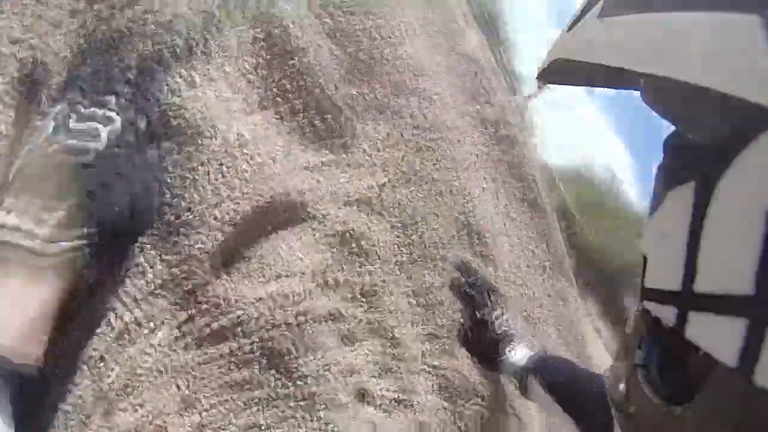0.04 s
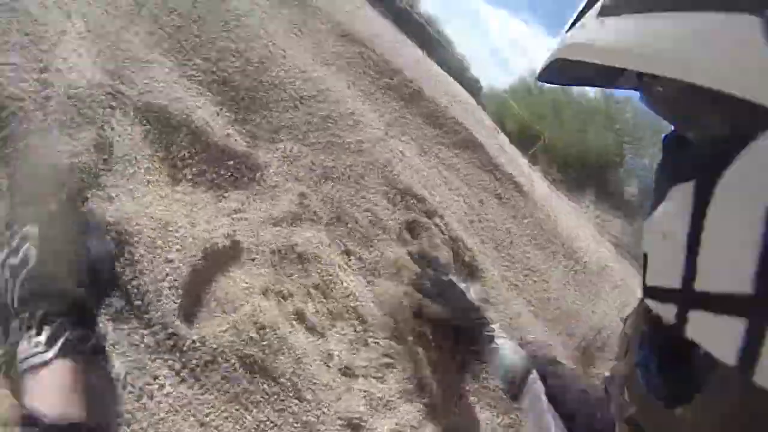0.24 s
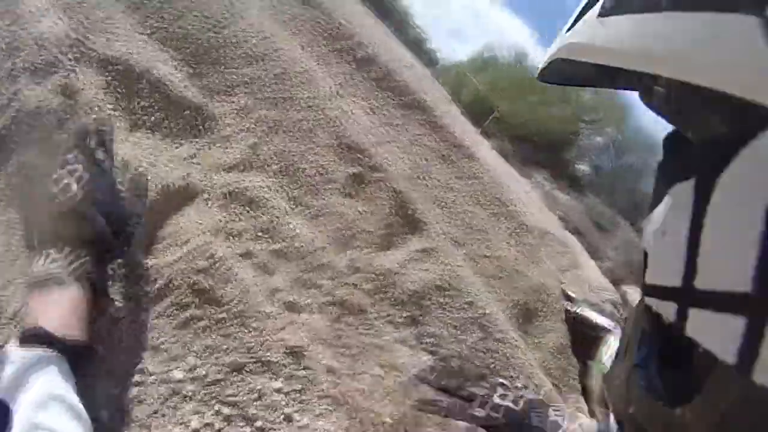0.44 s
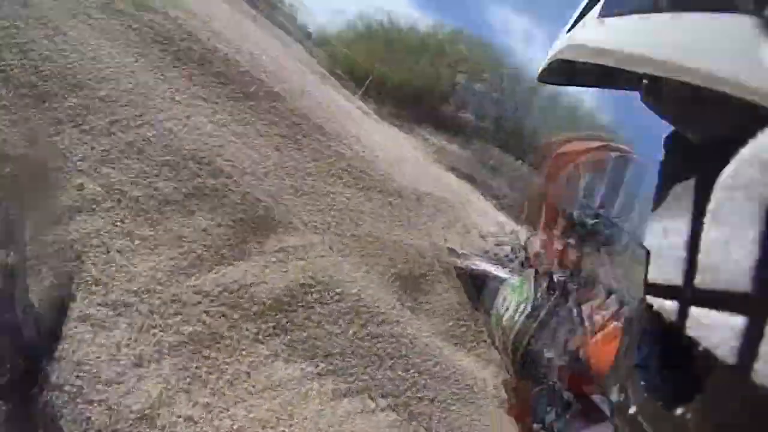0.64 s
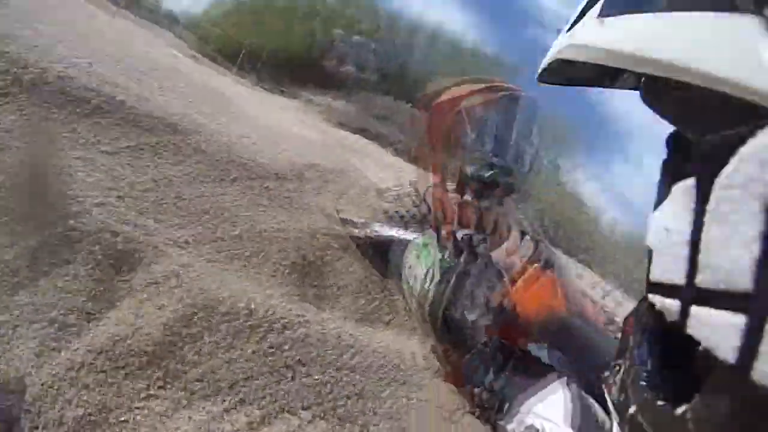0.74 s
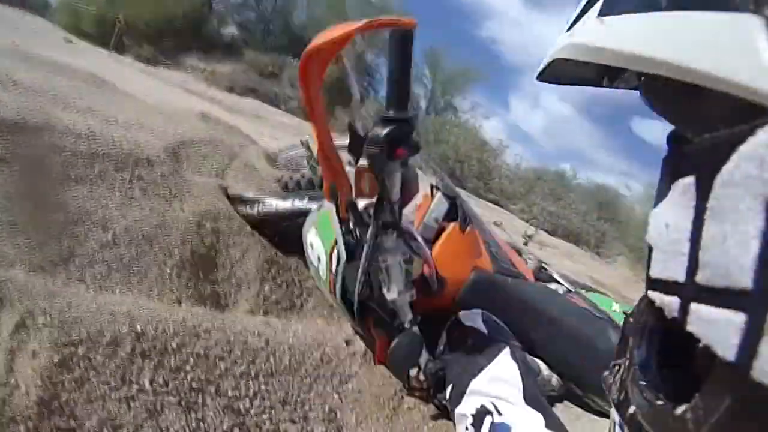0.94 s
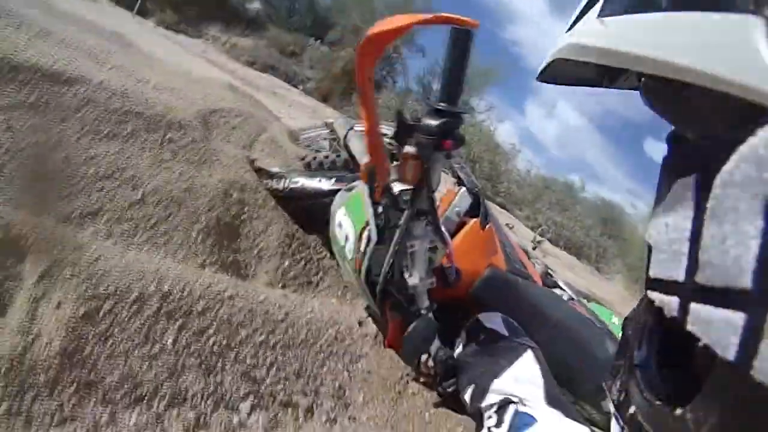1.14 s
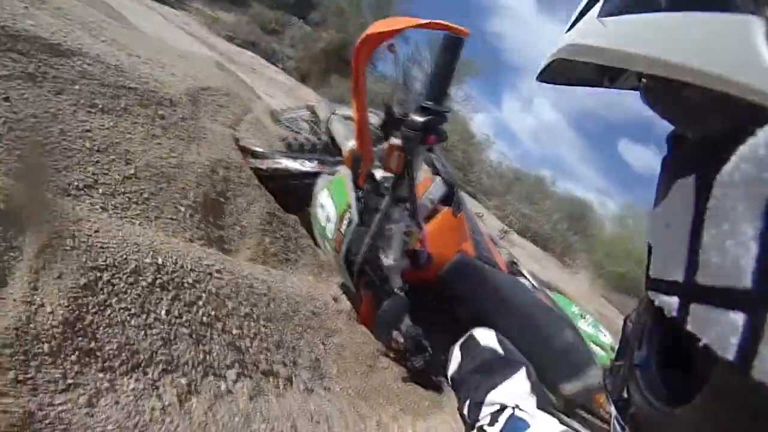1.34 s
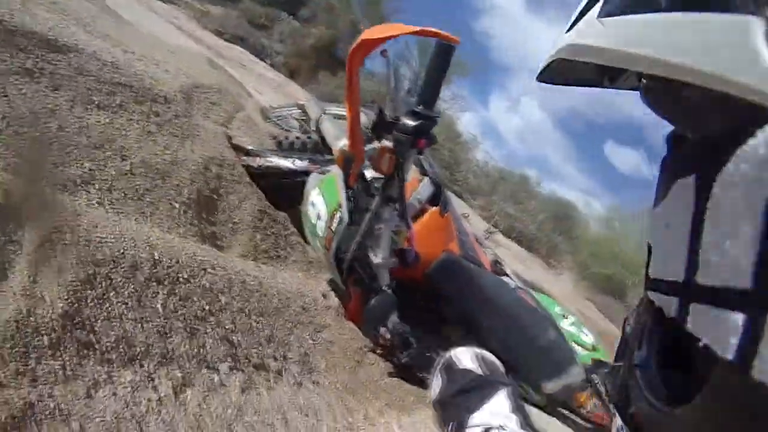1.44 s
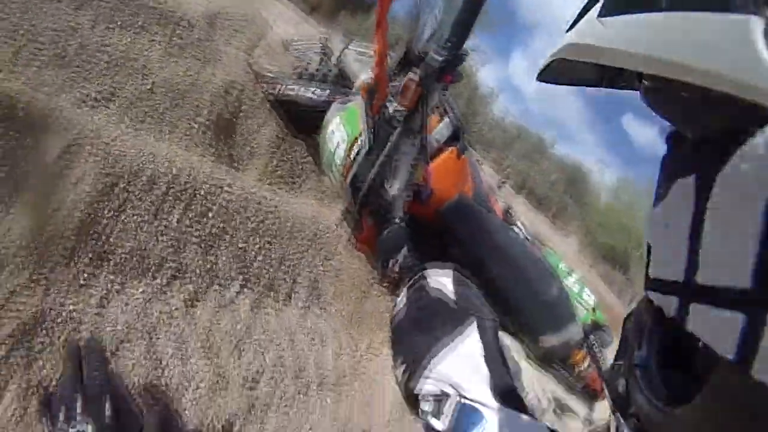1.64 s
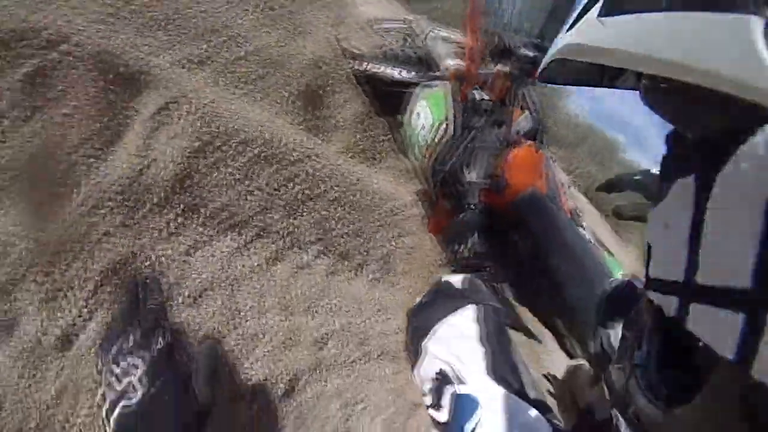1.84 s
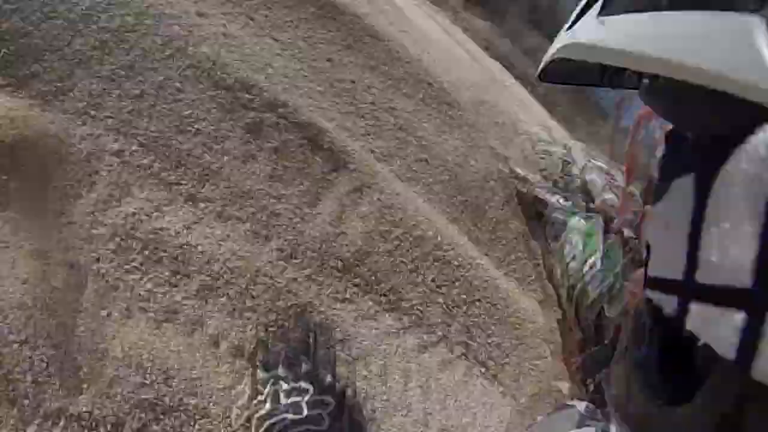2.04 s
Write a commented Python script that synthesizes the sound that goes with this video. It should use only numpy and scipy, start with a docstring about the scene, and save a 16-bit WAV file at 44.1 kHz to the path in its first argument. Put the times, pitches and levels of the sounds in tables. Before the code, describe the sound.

Thumps and knocks of a fallen motorcycle being handled on gravelly sand, close and muffled through a helmet mount. Gravel scuffs crunch in the first 0.5 s; deep jolts and thumps cluster at 0.2-0.4 s. The sharpest, heavy thump-knock hits at 0.68 s. Softer thuds fade by 1.2 s, leaving faint hiss, low rumble and grit ticks. Tiny high squeaks at 1.9 s precede a last thump-knock at 2.07 s.

```python
"""A fallen dirt bike is handled on gravelly sand, heard from a camera on the rider's helmet.
Filtered noise gives a faint hiss, a low rumble and dull rubbing throughout; bursts of random clicks
crunch as gravel in the first half second. From 0.2 s jolts rock the mount, decaying tones thump through
the helmet and damped modes knock on its shell. Noise bursts tick like grit from 0.1 s on; near 1.9 s
a wavering tone squeaks twice, and a last thump and knock land together at 2.07 s."""
import sys
import numpy as np
from scipy import signal
from scipy.fft import rfft, irfft
from scipy.io import wavfile
from scipy.ndimage import uniform_filter1d

SR = 44100
rng = np.random.default_rng(int(sys.argv[2]) if len(sys.argv) > 2 else 0)


def digitize_waveform(pressure):
    """Quantize a signal to 16-bit integers and store it at the path in sys.argv[1].

    Rows of a 2-D input are taken as channels; values are limited to [-1, 1].
    """
    field = np.atleast_2d(pressure).T
    bounded = np.clip(field, -1, 1)
    quanta = np.round(bounded * 32767).astype(np.int16)
    wavfile.write(sys.argv[1], SR, quanta)


N = 92610


def undb(db):
    """Amplitude gain is the exponential of a level in decibels."""
    return 10 ** (np.asarray(db) / 20)


def unit(x):
    """Normalisation: divide by the root mean square, leaving rms 1."""
    return x / np.sqrt(np.mean(x ** 2))


def clock():
    """Sampling: the time of each sample in seconds."""
    return np.arange(N) / SR


def curve(rows):
    """Amplitude modulation: a gain interpolated in decibels along (time_s, level_db)."""
    time_s, level_db = np.array(rows).T
    return undb(np.interp(clock(), time_s, level_db))


def colour(x, points, tilt_db=0):
    """Linear filtering: shape x by (pitch_hz, density_db), tilted in dB per octave; rms 1."""
    hz, db = np.array(points).T
    tilted_db = db + tilt_db * np.log2(hz / hz[0])
    bin_hz = np.maximum(np.arange(N // 2 + 1) * SR / N, 1)
    gain = undb(np.interp(np.log2(bin_hz), np.log2(hz), tilted_db))
    low_cut = np.minimum(bin_hz / hz[0], 1)  # 6 dB per octave below the first point
    return unit(irfft(rfft(x) * gain * low_cut, N))


def noise(points):
    """Coloured noise: white Gaussian noise given a spectrum, rms 1."""
    return colour(rng.standard_normal(N), points)


def walk(rate_hz):
    """Random modulation: stepped random values smoothed by a moving average, rms 1."""
    step = int(SR / rate_hz)
    values = np.repeat(rng.standard_normal(N // step + 1), step)
    return unit(uniform_filter1d(values, step)[:N])


def envelope(start, attack, hold, t60):
    """Damped response: rise over the attack, then lose 60 dB per t60 once hold s have passed."""
    age = clock() - start
    rise = np.sin(np.pi / 2 * np.clip(age / attack, 0, 1)) ** 2
    return rise * np.exp(-np.log(1000) * np.maximum(age - hold, 0) / t60)


def swell(start, length):
    """Half-sine window: a rounded rise and fall."""
    return np.sin(np.pi * np.clip((clock() - start) / length, 0, 1))


def tone(start, hz):
    """Simple harmonic motion, at zero phase at the given moment."""
    return np.sin(2 * np.pi * hz * (clock() - start))


GRAINS_PER_S, GRAIN_SPREAD_DB = 1800, 3.5


def grains():
    """Shot noise: dense random clicks of very unequal size and either sign."""
    size = undb(GRAIN_SPREAD_DB * np.minimum(rng.exponential(size=N), 4))
    struck = rng.random(N) < GRAINS_PER_S / SR
    return struck * size * rng.choice([-1, 1], N)


HISS_DB, HISS_FLICKER_DB = -54, 0.17  # mean level, rms flicker
# spectrum of the background hiss: pitch_hz, density_db (relative, per Hz)
HISS_COLOUR = [(100, 14), (300, -1.5), (650, 1.5), (1130, -6), (1650, 6), (2100, -2.5), (2800, -2),
               (3150, -2.5), (3550, 1), (4100, -9.5), (4550, -4), (5200, -11), (5800, -6.5), (6800, -11),
               (8000, -18.5), (9500, -19), (12000, -22.5), (15000, -29.5)]


def hiss():
    """Stationary noise: a coloured hiss whose level flickers only slightly."""
    return undb(HISS_DB + HISS_FLICKER_DB * walk(24.75)) * noise(HISS_COLOUR)


# rumble of the moving mount: time_s, level_db
RUMBLE_LEVEL = [(0, -31), (.12, -40), (.3, -23.5), (.6, -37.5), (.78, -31), (.9, -44), (1.3, -39.5),
                (1.55, -45), (1.7, -42.5), (2.1, -42.5)]
# its spectrum: pitch_hz, density_db (relative, per Hz)
RUMBLE_COLOUR = [(12, -9), (27, -7), (40, 12.5), (58, -19.5), (80, -24), (103, -6.5), (150, -23),
                 (250, -65), (600, -82)]


def rumble():
    """Low-frequency random vibration: noise that swells and sinks as the mount moves."""
    return curve(RUMBLE_LEVEL) * noise(RUMBLE_COLOUR)


RUB_FLICKER_DB = 1.42  # rms
# low rubbing of gear and bike as they shift: time_s, level_db
RUB_LEVEL = [(0, -41.5), (.07, -55.5), (.2, -41.5), (.31, -47.5), (.4, -58), (.45, -89), (.48, -38),
             (.55, -57), (.66, -48.5), (.78, -47.5), (.87, -42.5), (.95, -53.5), (1.02, -50), (1.1, -59.5),
             (2.1, -60)]
# its spectrum: pitch_hz, density_db (relative, per Hz)
RUB_COLOUR = [(100, 3.5), (200, -10), (380, -12), (520, -15), (660, -18), (850, -23), (1200, -32),
              (3000, -91)]


def rubbing():
    """Sliding friction: many small random impacts, dulled, with a flickering level."""
    flicker = undb(RUB_FLICKER_DB * walk(38))
    return curve(RUB_LEVEL) * flicker * colour(grains(), RUB_COLOUR)


SQUEAK_HZ, SQUEAK_WOBBLE = 12380, 0.0033  # wobble: rms fraction of the pitch
# pulses of the tiny squeak: start_s, length_s, level_db
SQUEAK_PULSES = [(1.91, 0.01, -43), (1.921, 0.019, -46.5)]


def squeak():
    """Frequency modulation: a thin, slightly unsteady friction tone in two pulses."""
    pitch_hz = SQUEAK_HZ * (1 + SQUEAK_WOBBLE * walk(320))
    whistle = np.sin(2 * np.pi * np.cumsum(pitch_hz) / SR)
    return whistle * sum(undb(db) * swell(s, length) for s, length, db in SQUEAK_PULSES)


TICK_ATTACK_S, TICK_HOLD_S, TICK_T60_S = 0.0011, 0.0042, 0.025
# single ticks of grit: start_s, level_db, ring_hz, ring_over_click_db, tilt_db (per octave)
GRIT_TICKS = [(.107, -52, 1580, 5, -13), (0.367, -43.5, 4080, -3.5, -3), (0.386, -58.5, 1530, 20, -14),
              (1.1087, -43.5, 6070, -18, 2.5), (1.538, -59.5, 1760, 12, 0), (1.6059, -49, 2350, 0, -8.5),
              (1.7568, -51.5, 3630, 10, -1), (1.9545, -48.5, 3560, -5.5, 3)]
# spectrum of the click before tilting: pitch_hz, density_db (relative, per Hz)
TICK_COLOUR = [(800, -8), (2500, 1), (3600, 5), (4700, 1), (5400, 5.5), (6400, 3.5), (9000, -12),
               (10500, -7), (13000, -15), (15000, -22)]


def ticks():
    """Impact excitation: each bit of grit gives a noise click and one brief ringing tone."""
    out = 0
    for s, db, hz, ring_db, tilt_db in GRIT_TICKS:
        click = colour(rng.standard_normal(N), TICK_COLOUR, tilt_db)
        ring = undb(ring_db) * tone(s, hz)
        out = out + undb(db) * envelope(s, TICK_ATTACK_S, TICK_HOLD_S, TICK_T60_S) * (click + ring)
    return out


SCUFF_ATTACK_S, SCUFF_T60_S = 0.0016, 0.03
# scuffs in the gravel: start_s, hold_s, level_db, tilt_db (per octave)
GRAVEL_SCUFFS = [(0, 0.025, -50.5, 4), (0.105, 0.0042, -44.5, 3.5), (0.118, 0.024, -51.5, 3.5),
                 (0.181, 0.055, -46.5, 0.5), (0.208, 0.017, -47.5, 8.5), (0.245, 0.019, -47, 4),
                 (0.279, 0.019, -48, 3.5), (0.333, 0.013, -50.5, 8.5), (0.382, 0.0028, -46, 7.5),
                 (0.413, .002, -49, 8), (0.487, 0.044, -55.5, -3.5)]
# spectrum of crushed gravel before tilting: pitch_hz, density_db (relative, per Hz)
GRAVEL_COLOUR = [(400, -11.5), (850, 6.5), (1130, -15.5), (1500, 16.5), (2000, -1), (2450, 7.5),
                 (3700, -13.5), (5700, -6.5), (8000, -26.5), (9700, -27), (15000, -41)]


def scuffs():
    """Granular impacts: each scuff crushes a spray of small stones, a burst of random clicks."""
    out = 0
    for s, hold, db, tilt_db in GRAVEL_SCUFFS:
        crunch = colour(grains(), GRAVEL_COLOUR, tilt_db)
        out = out + undb(db) * envelope(s, SCUFF_ATTACK_S, hold, SCUFF_T60_S) * crunch
    return out


KNOCK_ATTACK_S, CRACK_HOLD_S, CRACK_T60_S = 0.00046, 0.00079, 0.028
# hard contacts on the helmet shell: start_s, level_db, brightness_hz, crack_over_ring_db
SHELL_KNOCKS = [(0.1946, -28, 980, -0.5), (.258, -34.5, 800, -11), (.282, -36, 2500, -9.5),
                (.3215, -35.5, 1410, 0), (0.343, -36.5, 340, -1.5), (.467, -35.5, 5000, 1.5),
                (0.6767, -17.5, 4430, -7), (2.0719, -23, 1360, -9.5)]
# modes of the shell: pitch_hz, level_db (relative), t60_s
SHELL_MODES = [(238, -2, 0.038), (353, -2.5, 0.025), (464, -12.5, 0.025), (533, -13.5, 0.041),
               (655, -6.5, 0.067), (786, -15.5, 0.029), (955, -17, 0.033), (1375, -16, 0.05),
               (1540, -17, 0.025), (1753, -11.5, 0.024), (2350, -20, 0.029), (3150, -21, 0.0245),
               (4300, -22.5, 0.023), (5800, -21, 0.0078)]
# spectrum of the crack at contact: pitch_hz, density_db (relative, per Hz)
CRACK_COLOUR = [(200, 4), (450, 7.5), (820, -1.5), (1150, -14), (1450, -13), (1800, -0.5), (2080, -29.5),
                (2500, -7.5), (4000, -26.5), (8000, -41)]


def knocks():
    """Modal synthesis: contacts ring the plastic shell's modes with a crack, low-passed to a brightness."""
    out, crack_noise = 0, noise(CRACK_COLOUR)
    for s, db, bright_hz, crack_db in SHELL_KNOCKS:
        ring = 0
        for k, (hz, mode_db, t60) in enumerate(SHELL_MODES):
            sign = (-1) ** k  # neighbouring modes start in opposite directions
            ring = ring + sign * undb(mode_db) * envelope(s, KNOCK_ATTACK_S, 0, t60) * tone(s, hz)
        crack = undb(crack_db) * crack_noise * envelope(s, KNOCK_ATTACK_S, CRACK_HOLD_S, CRACK_T60_S)
        contact = signal.butter(2, bright_hz, fs=SR, output="sos")
        out = out + undb(db) * signal.sosfilt(contact, ring + crack)
    return out


THUMP_ATTACK_S, BOOM_T60_S, THUD_T60_S = 0.0039, 0.12, 0.13
# dull thumps through the helmet: start_s, pitch_hz, boom_level_db, boom_hold_s, thud_level_db
HELMET_THUMPS = [(.205, 140, -28, 0.024, -51), (0.254, 73, -16.5, 0.019, -47),
                 (0.283, 108.8, -15.5, 0.011, -60), (0.3232, 123.9, -16.5, .022, -24.5),
                 (0.363, 94.4, -28.5, 0.05, -70), (.463, 98.8, -40.5, 0.028, -61),
                 (.575, 98, -31, 0.023, -40.5), (.625, 142.7, -35.5, 0.044, -35),
                 (.6815, 126.5, -8.5, 0.0039, -19), (0.6923, 100.7, -11.5, 0.046, -53),
                 (0.836, 108.7, -38.5, 0.058, -41), (0.98, 93.3, -27.5, 0.022, -44),
                 (1.195, 106, -30, 0.011, -49), (2.0718, 129.7, -20, 0.0058, -19)]
# spectrum of the thud: pitch_hz, density_db (relative, per Hz)
THUD_COLOUR = [(25, -7), (70, 13.5), (140, 9.5), (240, 1.5), (400, -19), (800, -56)]


def thumps():
    """Damped resonance: each soft blow is a noisy thud and a low boom of the helmet."""
    out, thud_noise = 0, noise(THUD_COLOUR)
    for s, hz, db, hold, thud_db in HELMET_THUMPS:
        boom = undb(db) * envelope(s, THUMP_ATTACK_S, hold, BOOM_T60_S) * tone(s, hz)
        thud = undb(thud_db) * envelope(s, THUMP_ATTACK_S, 0, THUD_T60_S) * thud_noise
        out = out + boom + thud
    return out


ROCK_HZ, ROCK_ATTACK_S, ROCK_T60_S = 38.3, 0.021, 0.15
# heavy jolts that rock the mount: start_s, level_db, hold_s
MOUNT_JOLTS = [(0.1902, -6.5, 0.051), (0.264, -6, 0.012), (.317, -1.5, 0.012), (0.477, -27, 0.055),
               (0.697, -48, 0.031), (0.991, -35.5, 0.035), (1.289, -29.5, 0.042)]


def rocking():
    """Mass-spring resonance: the mount rocks at its lowest resonance after each jolt."""
    out = 0
    for s, db, hold in MOUNT_JOLTS:
        out = out + undb(db) * envelope(s, ROCK_ATTACK_S, hold, ROCK_T60_S) * tone(s, ROCK_HZ)
    return out


def scene():
    """Superposition: the pressures of all sources add at the one microphone."""
    background = hiss() + rumble() + rubbing()
    small_sounds = squeak() + ticks() + scuffs()
    return (background + small_sounds + knocks() + thumps() + rocking())[None]


TOP_HZ = 15400


def record(dry):
    """Band limiting: the camera cuts the top with a steep elliptic low-pass."""
    return signal.sosfilt(signal.ellip(8, .2, 70, TOP_HZ, fs=SR, output="sos"), dry)


dry = scene()
out = record(dry)
digitize_waveform(out)
```